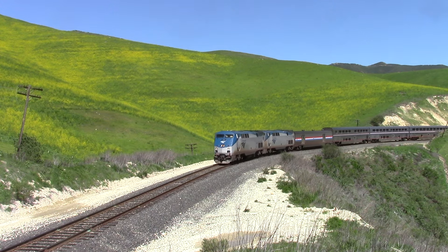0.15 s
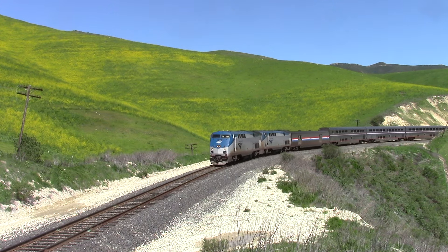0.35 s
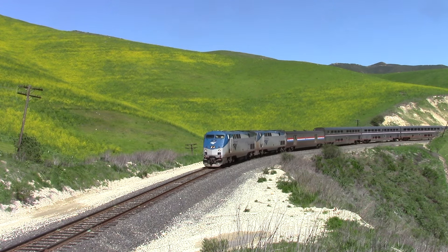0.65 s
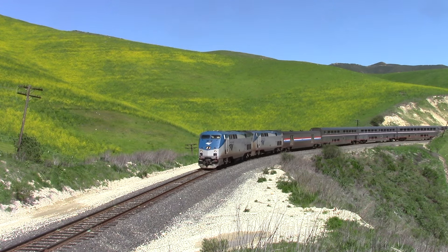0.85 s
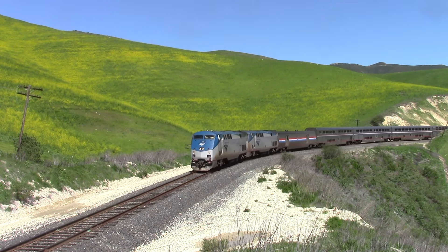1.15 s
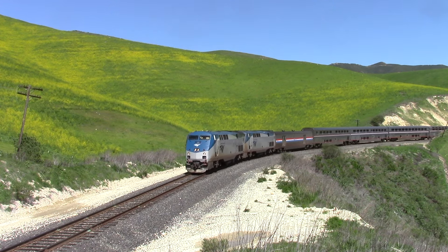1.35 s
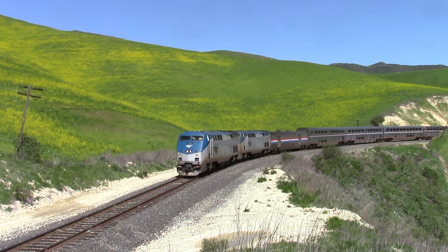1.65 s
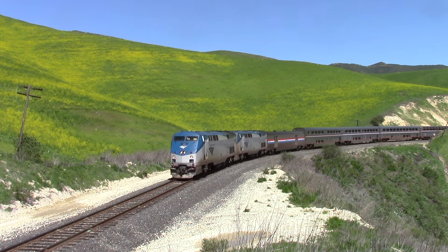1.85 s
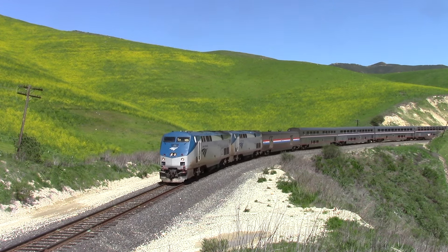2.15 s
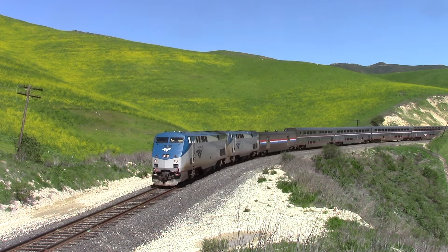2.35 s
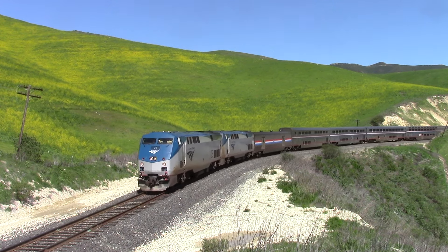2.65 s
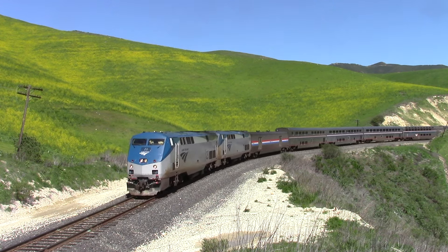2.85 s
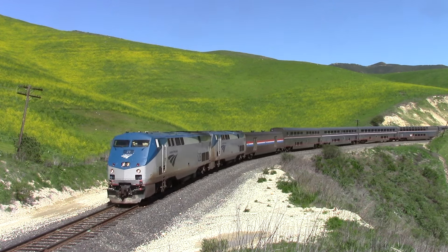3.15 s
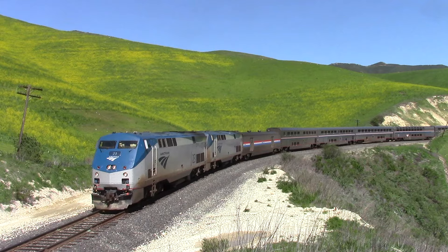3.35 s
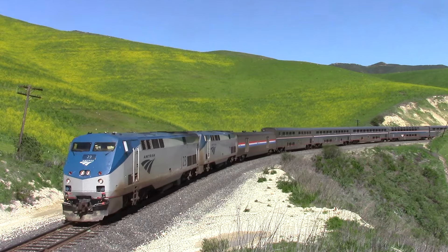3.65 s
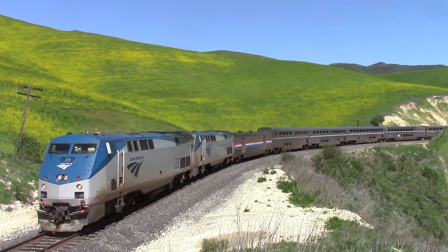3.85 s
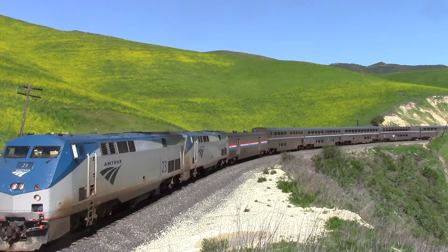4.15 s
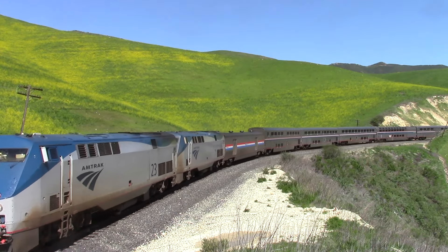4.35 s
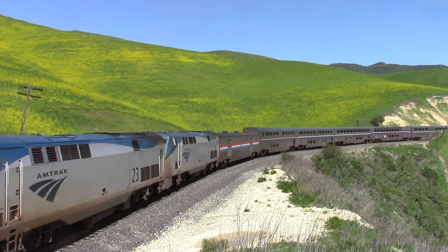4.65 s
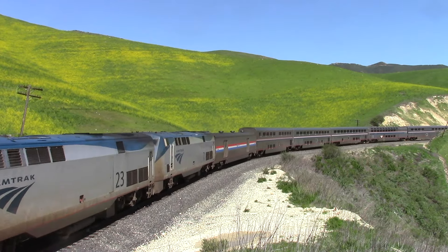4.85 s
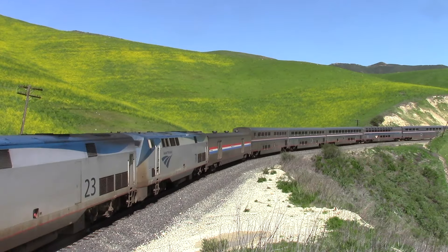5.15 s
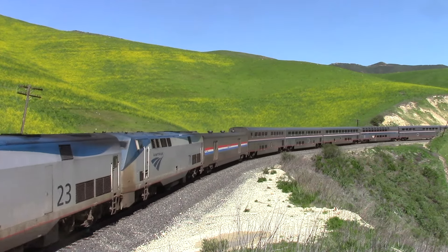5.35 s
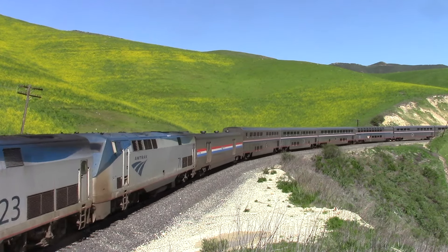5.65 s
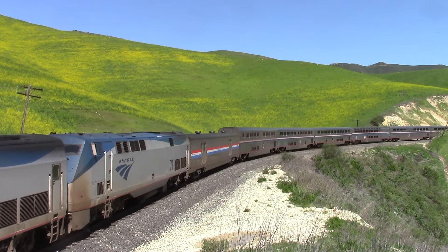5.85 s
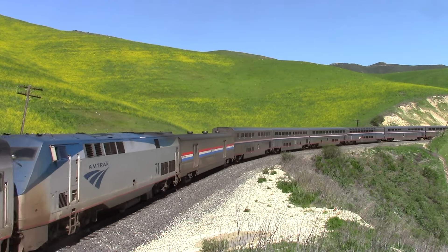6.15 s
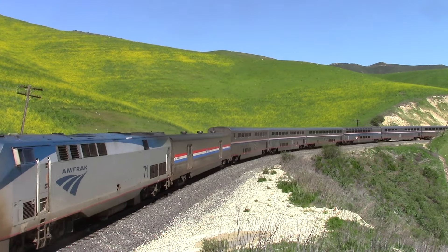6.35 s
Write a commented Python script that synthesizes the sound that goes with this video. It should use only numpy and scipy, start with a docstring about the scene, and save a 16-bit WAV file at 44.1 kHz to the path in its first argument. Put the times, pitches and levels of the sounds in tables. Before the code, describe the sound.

A diesel passenger train rounds a curve and rolls past, its steel wheels squealing in shifting high tones over a growing roar.

```python
"""Train squealing round a curve

Open country, stereo microphones beside the track. A diesel passenger train nears round a
curve and its locomotives roll past. Wheels slip sideways and squeal in one mode after another; each
tone swells, holds and fades, and trails a lower, Doppler-smeared skirt from the rails. Underneath are
rolling roar, the whine of the drive, a thin sizzle of the rails, flange chirps, puffs of air on the
microphones and, close by, flange scrapes."""
import sys
import numpy as np
from scipy import signal
from scipy.fft import rfft, irfft
from scipy.io import wavfile
from scipy.ndimage import uniform_filter1d, minimum_filter1d

SR = 44100
rng = np.random.default_rng(int(sys.argv[2]) if len(sys.argv) > 2 else 0)


def wrap_up_sound(samples):
    """Save the sound to the file named by the first command line argument, as 16-bit audio."""
    columns = np.atleast_2d(samples).T
    # keep every value between -1 and 1, then stretch to whole-number steps
    tamed = np.clip(columns, -1, 1)
    steps = np.round(tamed * 32767).astype(np.int16)
    wavfile.write(sys.argv[1], SR, steps)


N = 286650
T = np.arange(N) / SR
FREQS = np.maximum(np.arange(N // 2 + 1) * SR / N, 1)

# rolling noise at the trackside: f/Hz, level/dB
ROLL_SPECTRUM = [(25, -35), (50, -30), (100, -14.5), (180, -9), (280, 0.5), (420, -3), (900, -1),
                 (1400, -1), (2600, 1.5), (4700, -3.5), (8200, -4.5), (10300, -8.5), (12000, -15.5),
                 (15800, -18)]
# broad wheel resonances that rolling excites: f/Hz, width/Hz, lift/dB
ROLL_MODES = [(816, 48, 5.5), (1103, 24, 5.5), (3750, 1030, 3), (1910, 170, 4), (2930, 90, 4),
              (5970, 190, 4), (7070, 210, 5), (8040, 260, 4)]
# wheel roar, growing as the train nears: t/s, relative level/dB
ROAR_LEVEL = [(0.0, -40), (0.94, -41.5), (1.08, -35.5), (1.83, -35), (3.08, -36), (4.45, -28.5),
              (4.58, -35), (5.68, -29), (6.1, -30), (6.5, -25.5)]
# treble hiss that the rails carry ahead of the train: t/s, relative level/dB
HISS_LEVEL = [(0, -43.5), (0.58, -44), (0.95, -31.5), (2.25, -32), (3.2, -38), (3.55, -36), (4.45, -37),
              (4.93, -40.5), (5.45, -46), (6.1, -46), (6.33, -42), (6.5, -43)]
# ground rumble, body rumble, roar, grind and hiss:
# centre f/Hz, dB per dB of roar, dB per dB of hiss, change behind the flank/dB
ROLL_BANDS = [(91, 0.5, 0.43, -8.5), (286, 1.27, -0.05, -1), (1490, 1.14, 0.26, 1.1),
              (4800, 0.64, 0.65, -1.5), (10400, 0.17, 1, -3)]
# gear whine, falling as the locomotive draws level with the microphones: t/s, f/Hz, level/dB
GEAR_WHINE = [(0, 842, -63), (4.8, 842, -39.5), (5.35, 829.6, -34.5), (5.85, 806.4, -27.5), (6.5, 769, -25)]
# cooling fans: low tone f/Hz, high tone f/Hz
FAN_HZ = [548, 929]
# cooling fans: t/s, low tone level/dB, high tone level/dB
FAN_LEVELS = [(0, -59, -58), (2.1, -36.5, -48), (2.7, -48.5, -40.5), (3.4, -39, -40), (4.9, -41.5, -42.5),
              (6.5, -43.5, -61)]
# thin sizzle of the rails: f/Hz, level/dB
SIZZLE_SPECTRUM = [(2000, -100), (8500, -38), (10000, -15), (12300, -12), (13100, 1), (14150, -1.5),
                   (14500, -3), (16000, -19)]
# highest rail resonances: f/Hz, width/Hz, lift/dB
RAIL_MODES = [(13081, 20, 8), (13194, 18, 10), (14117, 16, 13), (14162, 16, 10)]
# the sizzle flares as a wheel rubs: full strength t/s, level/dB, rise/s, hold/s, fade/s
SIZZLE_FLARES = [(.55, -33, .15, .02, 0.074), (1.29, -24.5, 0.35, .12, 1.6), (1.872, -25.5, .35, .08, 1.7),
                 (3.54, -27.5, 0.42, 0.057, 0.34), (4.44, -30, 0.58, 0.036, 0.099),
                 (6.324, -24.5, 0.21, 0.042, 0.29)]
# pitch of each wheel mode, heard head-on: name -> f/Hz
MODE_HZ = {"howl": 1677, "moan": 1975, "groan": 1903, "squeal": 2932, "wail": 2912, "zing": 3686, "shriek":
           3980, "rasp": 3930, "screech": 5291, "whistle": 6652, "keen": 7203, "sing": 8160, "shrill": 8997,
           "pierce": 9184}
# squealing wheel modes: name, skirt depth as a share of pitch, tone level/dB, skirt level/dB,
# flutter/dB, skirt tilt/dB, steepness of the skirt's edges
WHEEL_MODES = [("howl", 0.059, 0.29, -3, 1.8, -2, 5.2), ("moan", 0.06, -2.5, 0.43, 1.1, -3, 2.8),
               ("groan", 0.014, -0.78, -8, 0.88, -8, 3.5), ("squeal", 0.034, -0.5, 0.27, 1, -6, 4.6),
               ("wail", 0.029, 0, -9, 1.7, -3, 4.3), ("shriek", 0.061, 0, -3.5, 3.4, -7.5, 4.7),
               ("rasp", 0.044, -4, -2.5, 3.2, -5, 4.1), ("screech", 0.061, -3, -1.1, 2.8, -1.5, 12),
               ("whistle", 0.011, -2, -2, 2.8, -5, 4.7), ("keen", 0.057, -0.84, 1, 1, -5, 8.1),
               ("shrill", 0.053, -7.5, 0, 2.6, -6, 11), ("pierce", 0.035, 0, -1.5, 2.9, -2.2, 9.5),
               ("zing", 0.02, -1.5, -2.2, 2.7, 0, 3), ("sing", 0.063, -5, -1, 3, -2, 8)]
# wheels further round the curve sound lower: pitch ratio, relative level/dB
FAR_WHEELS = [(.994, -10), (.9873, -14)]
# a sideways slip sets one mode going: full strength t/s, mode, level/dB, rise/s, hold/s, fade/s
SLIPS = [(0.106, "moan", -33.5, 0.36, 0.24, 0.29), (0.16, "rasp", -31.5, 0.16, .05, 0.55),
         (0.352, "squeal", -34.5, 0.4, .03, 0.25), (0.354, "howl", -33, 0.38, 0.12, 0.099),
         (0.67, "howl", -27.5, 0.17, 0.07, 0.33), (0.872, "pierce", -26, .12, 0.11, .2),
         (0.914, "sing", -28, 0.18, 0.38, .8), (0.963, "howl", -24, 0.5, 0.041, 0.16),
         (1.008, "pierce", -21.5, 0.17, .01, .85), (1.08, "shrill", -21.5, 0.3, .03, 0.4),
         (1.124, "rasp", -25, 0.35, .1, 0.55), (1.175, "pierce", -16, 0.11, 0.025, 0.06),
         (1.294, "screech", -24, 0.26, 0.42, 0.55), (1.557, "moan", -25.5, 0.2, 0.38, 0.2),
         (1.81, "squeal", -25, 0.55, .02, 0.15), (1.827, "screech", -19, 0.63, 0.19, 0.16),
         (1.983, "shriek", -21, 0.73, 0.069, 0.21), (2.274, "squeal", -12, 0.053, 0.0054, 0.07),
         (2.36, "whistle", -30.5, 0.63, 0.081, 0.7), (2.596, "shriek", -11.5, 0.17, 0.12, 0.19),
         (2.79, "shriek", -12.5, 0.16, 0.091, 0.94), (2.797, "squeal", -23, 0.34, 0.018, 0.11),
         (2.8, "screech", -23, 0.58, .45, 0.45), (2.89, "keen", -26.5, 0.65, 0.058, 0.72),
         (2.944, "squeal", -20, .15, .06, 0.15), (2.996, "shrill", -25.5, 1.3, 0.27, 0.34),
         (3.19, "shriek", -20.5, 0.095, 0.075, 0.34), (3.4, "shriek", -21, 0.31, 0.031, 0.4),
         (3.53, "screech", -22.5, 0.36, 0.06, 0.41), (3.62, "moan", -25, 0.16, 0.31, 0.18),
         (3.735, "squeal", -30.5, 1.1, 0.025, 0.42), (3.77, "groan", -28.5, 0.43, 0.36, 0.44),
         (4.04, "screech", -26, 0.55, 0.037, 0.39), (4.108, "rasp", -24.5, 0.87, .03, 2.7),
         (4.363, "groan", -21, 0.09, 0.019, 0.14), (4.39, "moan", -27, 0.9, 0.073, 0.23),
         (4.432, "wail", -8.5, 0.18, 0.063, 0.054), (4.497, "shrill", -35.5, 1, 0.14, 1.1),
         (4.55, "wail", -16, .1, .08, 0.38), (4.812, "wail", -20.5, .15, 0.064, 0.12),
         (4.97, "groan", -29, 0.59, .02, 0.28), (5.048, "zing", -22, 0.17, .02, 0.11),
         (5.073, "rasp", -28.5, 0.55, .06, 3.6), (5.097, "wail", -23, .12, 0.074, 0.31),
         (5.625, "wail", -24, 0.15, .025, .12), (6.068, "rasp", -20.5, 0.078, 0.27, 0.44),
         (6.12, "moan", -29, 1.1, 0.088, 1.3), (6.142, "groan", -29, 0.67, 0.11, .5)]
# short bites of a flange: t/s, f/Hz, level/dB, rise/s, decay/s, overtone level/dB, roughness (0-1)
FLANGE_BITES = [(.62, 3390, -27, 0.055, 0.17, -16, 0.65), (2.342, 2200, -23, 0.016, 0.14, -15, 0.13),
                (2.975, 2212, -20.5, 0.013, 0.13, -14, 0.1), (3.89, 2217, -19.5, 0.0081, 0.11, -9, 0.85),
                (4.745, 2190, -21, 0.018, 0.072, -7.5, 0.4), (4.82, 2200, -21, 0.014, 0.08, -20, 0.6),
                (5.65, 2137, -18.5, 0.013, 0.096, -10.5, 0.46)]
# overtones of a bite: pitch ratio, half-width/Hz, relative level/dB
BITE_OVERTONES = [(2.62, 220, 3), (3.18, 160, -4.5), (3.72, 220, -0.5)]
# puffs of air on the microphones: peak t/s, level/dB, rise/s, fade/s
AIR_PUFFS = [(1.2, -36, 0.13, 0.13), (3.23, -21.5, 0.032, 0.04), (3.75, -24, 0.087, 0.052),
             (4.007, -19.5, 0.051, 0.034), (4.088, -17, 0.052, 0.064), (4.18, -26.5, 0.086, 0.091)]
# dull flurry of a puff: f/Hz, level/dB
PUFF_SPECTRUM = [(40, -36), (110, -13.5), (230, 5.5), (380, 4.5), (650, -4.5), (1500, -25), (5000, -55)]
# flange scrapes close by: t/s, level/dB, rise/s, decay/s
SCRAPES = [(5.025, -22.5, 0.013, 0.09), (5.768, -19.5, 0.02, 0.17), (5.885, -30, 0.015, 0.027)]
# hiss of a sliding flange: f/Hz, level/dB
SCRAPE_SPECTRUM = [(200, -55), (2000, -7), (3000, -1), (5300, 0), (7100, -1.5), (8500, -7), (10000, -9.5),
                   (13000, -19)]
# wheel resonances in a scrape: f/Hz, width/Hz, lift/dB
SCRAPE_MODES = [(5300, 220, 3), (6980, 160, 8.5), (7950, 160, 6)]


def undb(db):
    """Decibels to gain."""
    return 10 ** (np.asarray(db) / 20)


def unit(x):
    """Scale to rms 1."""
    return x / np.sqrt(np.mean(x ** 2))


def curves(table):
    """Each column after t/s as a signal in time."""
    times, *columns = np.transpose(table)
    return [np.interp(T, times, column) for column in columns]


def colour(spectrum, modes=()):
    """Gain per frequency from a smooth spectrum and a few resonances."""
    hz, db = np.transpose(spectrum)
    peaks_db = sum(lift / (1 + (2 * (FREQS - f) / width) ** 2) for f, width, lift in modes)
    return undb(np.interp(np.log(FREQS), np.log(hz), db) + peaks_db)


def noise(gain):
    """Noise of rms 1 with the given gain per frequency."""
    return unit(irfft(rfft(rng.standard_normal(N)) * gain, N))


def walk(rate):
    """A random curve of spread about 1 that turns rate times a second."""
    count = int(T[-1] * rate) + 4
    return 1.203 * np.interp(T * rate + rng.random(), np.arange(count), rng.standard_normal(count))


def tone(hz, wander_hz, flutter_db, rate=45):
    """A self-sustained vibration whose pitch and strength waver."""
    phase = 2 * np.pi * np.cumsum(hz + wander_hz * walk(rate)) / SR
    return unit(np.sin(phase) * undb(flutter_db * walk(rate)))


def ring(hz, half_width_hz):
    """A resonance driven by rough contact."""
    return noise(1 / (1 + ((FREQS - hz) / half_width_hz) ** 2))


def swell(full_s, db, rise, hold, fade, range_db=20):
    """An exponential build-up, a hold and a dying away; rise and fade each span range_db."""
    early = np.maximum(full_s - T, 0) / rise
    late = np.maximum(T - full_s - hold, 0) / fade
    return undb(db - range_db * (early + late))


def burst(start, rise, decay):
    """An envelope that builds up and then rings away."""
    return np.clip((T - start) / rise, 0, 1) * np.exp(-np.maximum(T - start - rise, 0) / decay)


def steel_ripple(ripple_db, spacing_hz=22):
    """Countless small steel resonances ripple the treble."""
    grid = np.arange(0, SR / 2, spacing_hz)
    ripple = np.interp(FREQS, grid, rng.standard_normal(N)[:len(grid)])
    return undb(ripple_db * ripple * np.minimum(FREQS / 1500, 1))


def flank(from_s=4.48, close_s=0.086, until_s=6.06, open_s=0.17):
    """1 while the leading locomotive's side, between its bogies, screens the track, else 0."""
    return np.clip((T - from_s) / close_s, 0, 1) * np.clip(1 - (T - until_s) / open_s, 0, 1)


def rolling(level_db=-20, flicker_db=1.13):
    """Rough wheels on rough rails: the hiss runs ahead, the roar arrives with the locomotives."""
    spectrum = rfft(noise(colour(ROLL_SPECTRUM, ROLL_MODES) * steel_ripple(ripple_db=2.13)))
    roar, hiss, screened = curves(ROAR_LEVEL)[0], curves(HISS_LEVEL)[0], flank()
    log_centres = np.log([row[0] for row in ROLL_BANDS])
    out = 0
    for share, (_, by_roar, by_hiss, flank_db) in zip(np.eye(len(ROLL_BANDS)), ROLL_BANDS):
        band = irfft(spectrum * np.interp(np.log(FREQS), log_centres, share), N)
        db = by_roar * roar + by_hiss * hiss + flank_db * screened
        out = out + band * unit(undb(db + flicker_db * walk(25)))
    return out * undb(level_db)


def drive():
    """The gears of several axles whine at different pitches, faint at a distance; two fans hum."""
    hz, gear_db = curves(GEAR_WHINE)
    gears = unit(tone(hz, wander_hz=8.98, flutter_db=3.1)
                 + 0.52 * tone(1.2 * hz, wander_hz=14, flutter_db=2.6)
                 + 0.77 * tone(1.1 * hz, wander_hz=25.04, flutter_db=1.8))
    fans = sum(tone(fan_hz, wander_hz=2.63, flutter_db=2.8) * undb(db)
               for fan_hz, db in zip(FAN_HZ, curves(FAN_LEVELS)))
    return gears * undb(gear_db) + fans


def rail_sizzle(steady_db=-32.5, by_hiss=0.22, flank_db=-9, flicker_db=1.8, right_db=6, spread=0.79):
    """The highest rail modes follow the hiss, flare and flicker, louder in the right microphone."""
    gain = colour(SIZZLE_SPECTRUM, RAIL_MODES) * steel_ripple(ripple_db=0.5)
    mid, side = noise(gain), spread * noise(gain)
    pair = unit(np.array([mid + side, (mid - side) * undb(right_db)]))
    steady = unit(undb(by_hiss * curves(HISS_LEVEL)[0] + flank_db * flank())) * undb(steady_db)
    strength = np.sqrt(steady ** 2 + sum(swell(*flare) ** 2 for flare in SIZZLE_FLARES))
    return pair * strength * undb(flicker_db * walk(36))


def wheel_squeals(lag_s=0.0083):
    """Slipping wheels sing: Doppler shift is highest head-on; sound off the rails smears out below."""
    out = 0
    for name, depth, tone_db, skirt_db, flutter_db, tilt_db, edge in WHEEL_MODES:
        hz = MODE_HZ[name]
        envelope = np.sqrt(sum(swell(s, *shape) ** 2 for s, mode, *shape in SLIPS if mode == name))
        below = (hz - FREQS) / (hz * depth)  # 0 at the tone, 1 at the foot of the skirt
        tilt = undb(tilt_db * np.clip(below, 0, 1))
        skirt = noise(tilt / np.sqrt(1 + np.abs(2 * below - 1) ** edge))
        far_wheels = sum(tone(hz * ratio, wander_hz=0.00099 * hz, flutter_db=3) * undb(db)
                         for ratio, db in FAR_WHEELS)
        smear = unit(skirt + 0.5 * far_wheels) * np.interp(T - lag_s, T, envelope)
        direct = tone(hz, 0.000736 * hz, flutter_db) * envelope
        out = out + direct * undb(tone_db) + smear * undb(skirt_db)
    return out


def flange_chirps():
    """A flange bites the rail and rings its wheel."""
    out = 0
    for start, hz, db, rise, decay, overtone_db, roughness in FLANGE_BITES:
        overtones = sum(ring(hz * ratio, width) * undb(lift) for ratio, width, lift in BITE_OVERTONES)
        clean = np.sqrt(1 - roughness) * tone(hz, wander_hz=9.3, flutter_db=0.49)
        rough = np.sqrt(roughness) * ring(0.985 * hz, 0.014 * hz)
        wheel = clean + rough + undb(overtone_db) * overtones
        out = out + wheel * undb(db) * burst(start, rise, decay)
    return out


def air_puffs():
    """Eddies of air strike the microphones: dull flurries that swell and die almost evenly."""
    flurry = noise(colour(PUFF_SPECTRUM))
    return flurry * np.sqrt(sum(swell(s, db, rise, 0, fade) ** 2 for s, db, rise, fade in AIR_PUFFS))


def flange_scrapes(judder_db=0.7, judder_rate=110):
    """Close by, a flange slides along the rail in fits, and the wheel colours the hiss."""
    rub = noise(colour(SCRAPE_SPECTRUM, SCRAPE_MODES))
    judder = unit(undb(judder_db * walk(judder_rate)))
    return rub * judder * sum(undb(db) * burst(s, rise, decay) for s, db, rise, decay in SCRAPES)


def stereo_image(x, side_db=-12, knee_hz=8000):
    """Bass and middle sit in the centre; the treble spreads and leans right."""
    grid = np.arange(0, SR, 4)
    spread = .8 + .7 * np.interp(FREQS, grid, rng.standard_normal(len(grid)))
    treble = 1 / np.sqrt(1 + (knee_hz / FREQS) ** 6 + (4000 / FREQS) ** 16)
    lean_right = (FREQS / 20000) ** 6.3
    side = irfft(rfft(x) * (1j * spread * treble * undb(side_db) - lean_right), N)
    return np.array([x + side, x - side])


def scene():
    """The train is nearly centred; only its treble spreads."""
    train = rolling() + wheel_squeals() + flange_chirps() + flange_scrapes() + air_puffs() + drive()
    return stereo_image(train) + rail_sizzle()


def record(dry, ceiling=0.9, window_samples=400, top_hz=15750):
    """A fast limiter holds the loudest squeals; the recorder cuts the top."""
    headroom = np.minimum(1, ceiling / (np.abs(dry).max(axis=0) + 1e-9))
    gain = uniform_filter1d(minimum_filter1d(headroom, size=window_samples), size=window_samples)
    lowpass = signal.ellip(10, .2, 80, top_hz, fs=SR, output="sos")
    return signal.sosfilt(lowpass, dry * gain)


dry = scene()
out = record(dry)
wrap_up_sound(out)
```